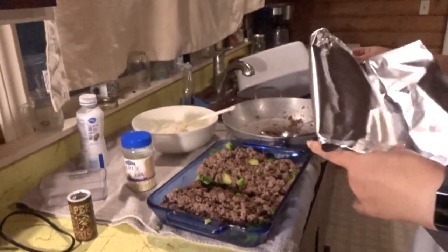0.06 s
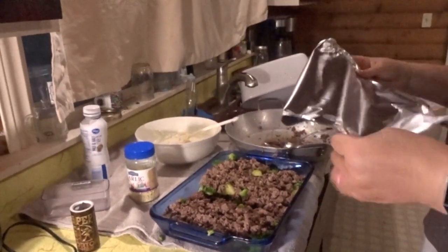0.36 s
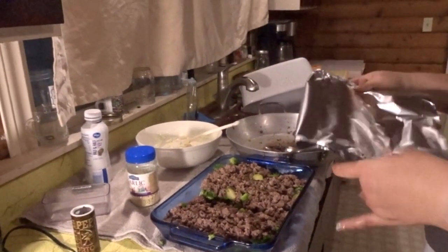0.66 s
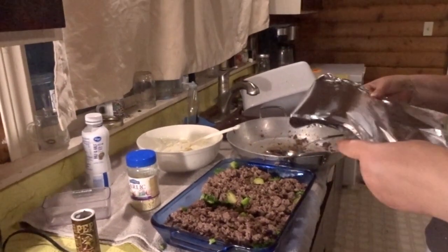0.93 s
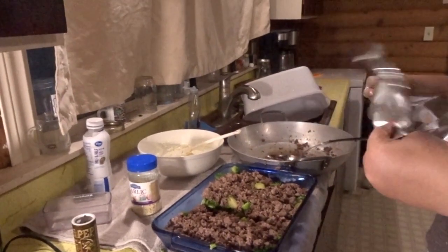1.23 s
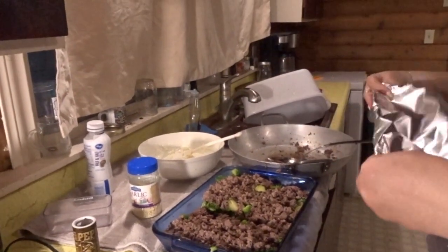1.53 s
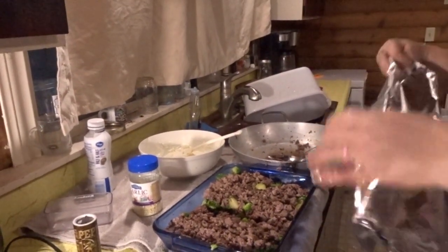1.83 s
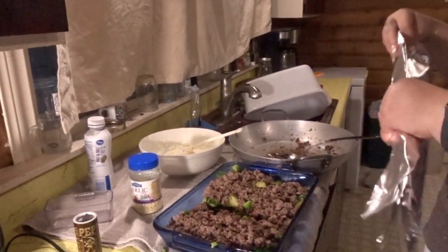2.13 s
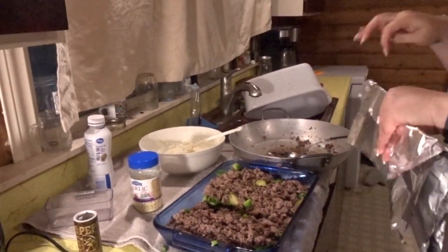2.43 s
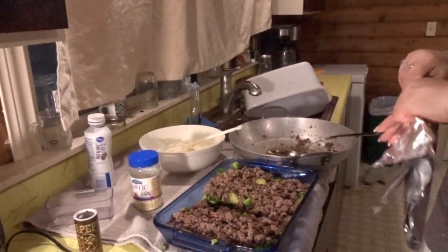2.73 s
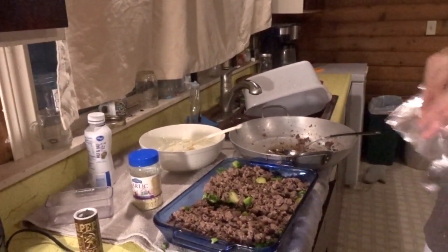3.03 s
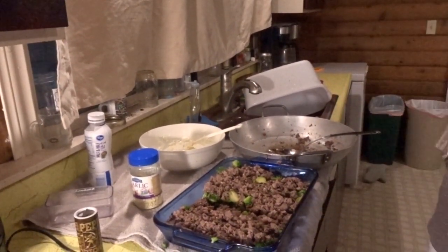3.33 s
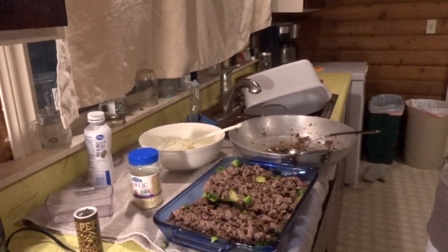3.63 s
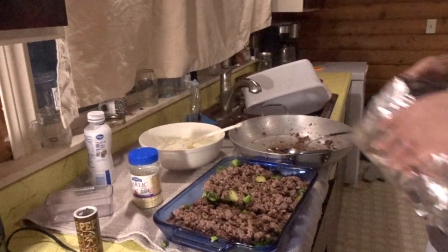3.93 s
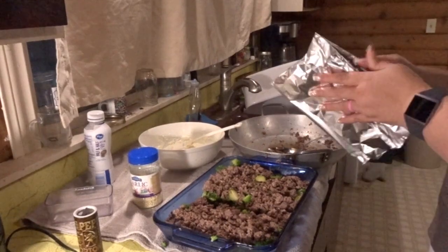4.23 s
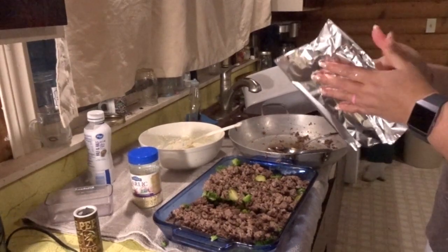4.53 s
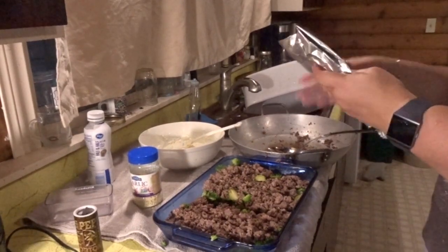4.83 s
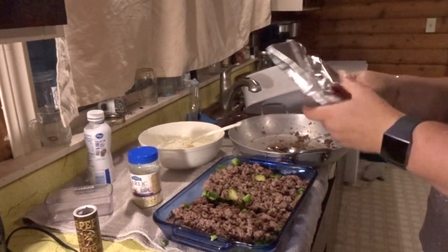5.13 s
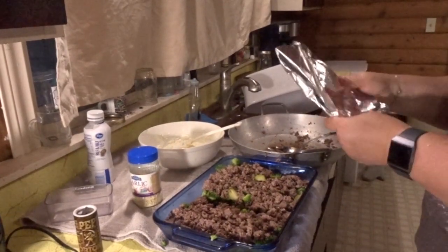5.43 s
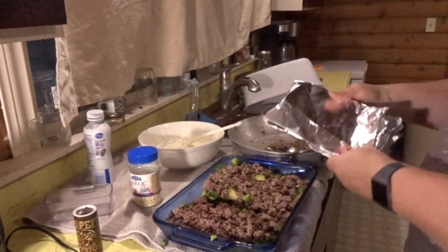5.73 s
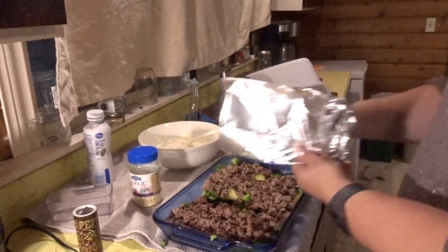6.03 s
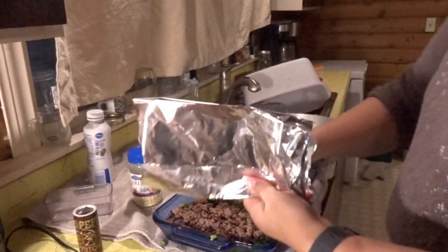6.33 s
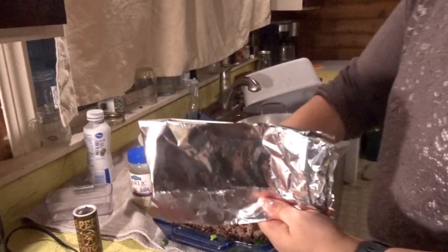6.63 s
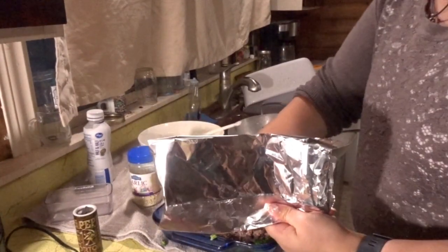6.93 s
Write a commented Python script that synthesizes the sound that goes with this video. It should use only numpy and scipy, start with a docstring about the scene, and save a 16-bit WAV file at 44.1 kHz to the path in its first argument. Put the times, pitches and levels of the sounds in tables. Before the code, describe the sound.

Aluminium foil crinkles and snaps as hands fold and flatten it, then fades to soft taps over a faint appliance hum.

```python
"""A small kitchen, a close-spaced microphone pair, two hands working aluminium foil a little to the right.
From the start the sheet is crumpled and folded: thousands of tiny creases buckle under each stroke, and
now and then a whole facet snaps through. Lighter pushes flatten it; from about 6 s it is lowered over
a dish with a few soft taps. Throughout, counter and room throw the crackle back and an appliance hums."""
import sys
import numpy as np
from scipy import signal
from scipy.fft import rfft, irfft, next_fast_len
from scipy.io import wavfile
from scipy.ndimage import uniform_filter1d

SR = 44100
rng = np.random.default_rng(int(sys.argv[2]) if len(sys.argv) > 2 else 0)


def log_audio(samples):
    """Write samples as a 16-bit WAV file to the path given in sys.argv[1]."""
    # one column per channel
    frames = np.atleast_2d(samples).T
    # limit to full scale, then quantise
    limited = np.clip(frames, -1, 1)
    pcm = np.round(limited * 32767).astype(np.int16)
    wavfile.write(sys.argv[1], SR, pcm)


N = 316197
T = np.arange(N) / SR


def amp(db):
    """Decibels to gain."""
    return 10 ** (np.asarray(db) / 20)


def unit(x):
    """Scales to rms 1."""
    return x / np.sqrt(np.mean(x ** 2) + 1e-20)


def read(points, hz):
    """Reads a table on a log-frequency axis."""
    f, value = np.transpose(points)
    return np.interp(np.log(hz + 1), np.log(f + 1), value)


def add(mix, start_s, sound):
    """Mixes a stereo sound in at start_s."""
    part = mix[:, max(round(start_s * SR), 0):][:, :sound.shape[1]]
    part += sound[:, :part.shape[1]]


def wander(per_s):
    """A new random value per_s times a second, joined by straight lines."""
    return np.interp(T * per_s, np.arange(1024), rng.standard_normal(1024))


def colour(x, gain):
    """Causal filter with the magnitude gain(hz), so that clicks keep their attack."""
    hz = abs(np.fft.fftfreq(4096, 1 / SR))
    minimum_phase = np.exp(np.conj(signal.hilbert(np.log(gain(hz) + 1e-5))))
    impulse = np.fft.ifft(minimum_phase).real[None, :len(hz) // 2]
    return signal.oaconvolve(x, impulse, axes=1)[:, :x.shape[1]]


def diffuse(pair):
    """Two close-spaced microphones hear diffuse bass alike and diffuse treble apart."""
    # likeness of left and right: f/Hz, correlation
    likeness = [(60, 0.92), (400, 0.95), (1200, 0.66), (2600, 0.57), (5500, -0.097), (11000, 0.24)]
    z = rfft(pair)
    same = read(likeness, np.fft.rfftfreq(pair.shape[1], 1 / SR))
    mid, side = z[0] * np.sqrt((1 + same) / 2), z[1] * np.sqrt((1 - same) / 2)
    return irfft([mid + side, mid - side], pair.shape[1])


def appliance(rush_db=-52.5, whirr_db=-57, whirr_hz=335, width_hz=55, waver=0.26, drift_hz=1.264):
    """In the background, a fan's rush with one broad resonance, and wavering motor tones."""
    # spectrum of the rush: f/Hz, relative density/dB
    rush_shape = [(18, -67), (30, -20.5), (49, -25), (157, -18.5), (216, -15.5), (338, -14), (382, -11.5),
                  (477, -17), (514, -22.5), (626, -15.5), (1280, -31.5), (1450, -28), (1680, -31.5),
                  (8590, -44), (11000, -52), (14300, -103), (22000, -120)]
    # motor tones: f/Hz, rms level/dB
    motor_tones = [(59.3, -73), (243, -63), (339.1, -62.5), (1405, -66.5), (1577, -76.5), (3370, -79.5)]
    noise = lambda gain: unit(colour(diffuse(rng.standard_normal((2, N))), gain))
    slow = lambda: np.interp(T, np.linspace(0, T[-1], 60), rng.standard_normal(60))
    rush = noise(lambda f: amp(read(rush_shape, f)))
    whirr = noise(lambda f: 1 / (1 + (2 * (f - whirr_hz) / width_hz) ** 2))
    hum = np.zeros(N)
    for hz, db in motor_tones:
        swell = np.sqrt(2) * amp(db) * (1 + waver * slow())
        hum += swell * np.sin(2 * np.pi * np.cumsum(hz + drift_hz * slow()) / SR)
    return amp(rush_db) * rush + amp(whirr_db) * whirr + hum


def room_echo(gap_s=0.0034, size=20000):
    """A short diffuse echo from cupboards and wooden walls, gap_s behind the direct sound."""
    # reverberation of the kitchen: f/Hz, t60/s
    decay_times = [(200, 0.23), (1000, 0.47), (4000, 0.18), (11000, 0.39)]
    reflections = rng.standard_normal((2, size)) * (rng.random((2, size)) < .1)
    reflections *= np.arange(size) / SR > gap_s
    hz, t, z = signal.stft(diffuse(reflections), SR, nperseg=256)
    echo = signal.istft(z * amp(-60 * t / read(decay_times, hz)[:, None]), SR, nperseg=256)[1]
    return echo / np.linalg.norm(echo[0])


def kitchen(x, wet_db=-6, moves_per_s=3, count=4):
    """Adds the room, fading between echo patterns as the sheet moves and bends."""
    fades = [np.cos(np.pi * (moves_per_s * T + k / count)) * np.sqrt(2 / count) for k in range(count)]
    echoes = sum(signal.oaconvolve(x * fade, room_echo(), axes=1)[:, :N] for fade in fades)
    return x + amp(wet_db) * echoes


def knocks(burst_t60_s=0.045, size=8192):
    """Damped taps of foil panels and of hands by the dish, each ringing around one resonance."""
    # taps: t/s, level of half the peak/dB, f/Hz, sharpness Q
    taps = [(2.017, -30, 8160, 6.8), (5.051, -29, 850, 5.1), (5.485, -32, 1950, 7),
            (5.89, -30.5, 2550, 8.4), (5.893, -26, 3900, 8), (6.112, -43.5, 1000, 1.6),
            (6.181, -45, 960, 1.7), (6.225, -47.5, 850, 3), (6.709, -53, 2610, 5), (6.752, -47, 160, 2),
            (6.753, -55, 1800, 16), (6.754, -50, 4990, 15), (6.844, -46, 623, 5.4), (6.92, -49, 1310, 5.1)]
    out, t = np.zeros((2, N)), np.arange(size) / SR
    for start, db, hz, sharpness in taps:
        burst = diffuse(rng.standard_normal((2, size))) * amp(-60 * t / burst_t60_s)
        tap = colour(burst, lambda f: 1 / np.hypot(1, sharpness * (f / hz - hz / (f + 1))))
        add(out, start, 2 * amp(db) * tap / abs(tap).max())
    return out


def facet(ring_s=0.00042, patchy_db=4, lag_s=3.3e-5, scatter_s=0.0069, size=1024):
    """One buckle: a click rings the sheet briefly in its own resonances; hands and counter scatter it."""
    t, hz = np.arange(size) / SR, np.fft.rfftfreq(size, 1 / SR)
    ring = rng.standard_normal(size) * np.exp(-t / (ring_s * np.exp(.5 * rng.standard_normal())))
    resonances = unit(uniform_filter1d(rng.standard_normal(len(hz)), size=30))
    ring = colour(ring[None], lambda f: amp(patchy_db * np.interp(f, hz, resonances)))
    left_lag = lag_s * (1 + 0.13 * rng.standard_normal())  # the left microphone is farther from the foil
    direct = np.exp(-2j * np.pi * hz * (np.array([[left_lag], [0]]) + 8 / SR))
    echoes = rng.standard_normal((2, size)) * (rng.random((2, size)) < .1) * np.exp(-t / scatter_s)
    echoes = diffuse(unit(echoes)) / np.sqrt(size)
    return unit(irfft(rfft(ring) * (direct + rfft(echoes))))


def sheet(count=180):
    """Many unlike facets, whose resonances together cover all pitches evenly."""
    z = rfft(np.array([facet() for _ in range(count)]))
    return irfft(z / np.sqrt(np.mean(abs(z) ** 2, axis=(0, 1))))


def buckle(clicks, facets):
    """Each click rings one facet of the sheet."""
    out = np.zeros((2, len(clicks)))
    place = rng.integers(0, len(facets), len(clicks))
    for i in np.flatnonzero(clicks):
        add(out, i / SR, clicks[i] * facets[place[i]])
    return out


def bend(x, panel_hz=3180, swing_octaves=0.53, width_octaves=0.064, panel_db=2.5, patches_db=1):
    """The sheet's resonances shift as it bends: one follows the free panel, small ones come and go."""
    hz, t, z = signal.stft(x, SR, nperseg=512)
    centre_hz = panel_hz * 2 ** (swing_octaves * np.interp(t, T, wander(per_s=5)))
    panel = np.exp(-(np.log2((hz[:, None] + 1) / centre_hz) / width_octaves) ** 2)
    patches = uniform_filter1d(rng.standard_normal(z.shape[1:]), size=4, axis=0)
    patches = unit(uniform_filter1d(patches, size=8, axis=1))
    return signal.istft(z * amp(panel_db * panel + patches_db * patches), SR, nperseg=512)[1][:, :N]


def registers(x, low_hz=1300, high_hz=6200):
    """Gives the foil its colour and splits it into broad flexing, creases and fine wrinkles."""
    # spectrum of the foil: f/Hz, relative density/dB
    foil_shape = [(50, -42.5), (100, -25), (170, -18.5), (240, -9), (300, -16.5), (420, -12.5), (520, -8),
                  (800, -7.5), (1400, -4.5), (2100, -0.1), (3200, 2.5), (5000, 2.03), (8000, 2), (11000, 0)]
    size = next_fast_len(x.shape[1] + 512)
    hz = np.fft.rfftfreq(size, 1 / SR)
    z = rfft(colour(x, lambda f: amp(read(foil_shape, f))), size)
    low = 1 / (1 + (hz / low_hz) ** 5)
    high = 1 - 1 / (1 + (hz / high_hz) ** 6)
    return [irfft(z * share, size)[:, :x.shape[1]] for share in (low, 1 - low - high, high)]


def snaps(facets, tilt_db=1, run_s=0.0083, follow=0.55, per_s=3000, size=3000):
    """A large facet flips over and sets off a short run of its neighbours."""
    # snaps: t/s, crease level/dB, then fine wrinkles/dB and flexing/dB re the crease, before the tilt
    flips = [(0.18, -22, 2, -19.5), (0.226, -27, -1, -13.5), (0.573, -22, 0, -21), (0.652, -36, 10, -15),
             (0.983, -30.5, 16, -4), (2.016, -42.5, 15, -20), (2.442, -29, 2, -25), (2.527, -33.5, 5, -29),
             (2.685, -28, 10.5, -5), (2.88, -33, 5, -21), (3.304, -35, 0.5, -20), (3.479, -23, -9, -14),
             (3.825, -29, 1, -15), (4.003, -32, 5, -18), (4.103, -39.5, 13.5, -10),
             (4.171, -16.5, -12, -17), (4.322, -26, -10, -20), (4.536, -38, 0, -15), (4.697, -32, -9, -15),
             (4.904, -44, 3, -20), (4.953, -32, -7, -20), (4.972, -30, 2, -18), (5.047, -23, 2, -13),
             (5.119, -31, 3, -11), (5.258, -28.5, 5, -18), (5.565, -34, 6.5, -23), (5.596, -44, 6, -20),
             (5.709, -33, 7, -6), (5.787, -37, 7.5, -6), (5.8897, -27.5, -6, -32), (5.894, -36, 2, -28),
             (5.922, -42, -9.5, 1), (6.044, -52, -5, -15), (6.118, -42, -6, -17), (6.376, -61, -18, 11.5),
             (6.578, -58.5, 8.5, -10), (6.708, -58.5, -8, -13), (6.752, -57.5, -10, -4)]
    out, t = np.zeros((2, N)), np.arange(size) / SR
    for start, level, fine, flex in flips:
        clicks = follow * rng.standard_normal(size) * (rng.random(size) < per_s / SR) * np.exp(-t / run_s)
        clicks[0] = 1  # the flip itself
        for band, db in zip(registers(buckle(clicks, facets)), (flex - tilt_db, 0, fine + tilt_db)):
            peak = np.sqrt(uniform_filter1d((band ** 2).mean(0), size=88).max())
            add(out, start, band / peak * amp(level + db))
    return out


def hands(sag_db_per_s=8, release_db_per_s=184):
    """The foil gives way under each push and settles on release; gives level and fine share in dB."""
    # pushes into the sheet: t/s, attack/s, hold/s, level/dB, base share of fine wrinkles/dB
    strokes = [(-0.005, 0.005, 0.035, -30, -2), (0.087, 0.012, 0.072, -29.0, -0.5),
               (0.131, 0.052, 0.16, -22.5, 3), (0.375, 0.044, 0.044, -27.5, -3.5),
               (0.476, 0.012, 0.127, -25.5, 3), (0.634, 0.019, 0.2, -22.5, 4.5),
               (0.893, 0.0037, 0.067, -28.5, 1), (0.956, 0.052, 0.12, -23.0, 4.5),
               (1.133, 0.048, 0.17, -23.0, 0.5), (1.337, 0.023, 0.2, -25, 0),
               (1.564, 0.037, 0.15, -25, -0.5), (1.755, 0.045, 0.0066, -26, 0),
               (1.951, 0.016, 0.087, -44, -3), (2.107, 0.029, 0.08, -22, 0), (2.251, 0.082, 0.12, -31, 1.5),
               (2.5, 0.015, 0.125, -42.0, 7.5), (2.634, 0.075, 0.02, -22.5, 1.5),
               (2.755, 0.028, 0.011, -26.5, -2), (2.88, 0.0025, 0.0053, -31.5, -2),
               (2.909, 0.038, 0.1, -29.5, 3), (3.065, 0.052, 0.094, -24, 3),
               (3.287, 0.025, 0.196, -28.5, 3), (3.465, 0.0055, 0.2, -28.5, 0.5),
               (3.732, 0.053, 0.27, -34.5, 5.5), (4.09, 0.0084, 0.075, -39.5, 7),
               (4.166, 0.0055, 0.1, -26, 3.5), (4.292, 0.0216, 0.041, -25.0, 1),
               (4.369, 0.0087, 0.079, -30.5, 2), (4.512, 0.027, 0.065, -36.5, 3),
               (4.627, 0.031, 0.095, -35.5, 7), (4.78, 0.0094, 0.048, -39.5, 6.5),
               (4.941, 0.016, 0.012, -33, 6), (5.015, 0.024, 0.059, -31.5, 2), (5.154, 0.13, 0.014, -34, 1),
               (5.307, 0.012, 0.079, -30, 5.5), (5.459, 0.021, 0.004, -39, 8),
               (5.558, 0.018, 0.069, -37, 7), (5.699, 0.01, 0.0032, -36, 10),
               (5.761, 0.016, 0.02, -42, 1.5), (5.913, 0.003, 0.035, -40.5, 10)]
    power, fine = np.zeros(N), np.zeros(N)
    for start, attack, hold, db, fine_db in strokes:
        held = np.maximum(T - start - attack, 0)
        fall_db = sag_db_per_s * held + release_db_per_s * np.maximum(held - hold, 0)
        push = (np.clip((T - start) / attack, 0, 1) * amp(db - fall_db)) ** 2
        power += push
        fine += push * fine_db
    return 10 * np.log10(power + 1e-12), fine / (power + 1e-12)


def crackle(facets, firm_db=-24.5, firm_clicks_per_s=3400, uneven_db=1, spread_db=2, clump_db=1.06):
    """Creases buckle in little avalanches; the harder the stroke, the more of them each second."""
    # broad flexing, strongest as the sheet is doubled over or patted flat: t/s, share at a firm push/dB
    flexing = [(.1, -14), (.4, -14.5), (.7, -18.5), (1.2, -12.5), (1.8, -15), (3.1, -15), (3.6, -13),
               (4.3, -12.8), (4.7, -16.5), (5.8, -13)]
    level, fine = hands()
    level += uneven_db * wander(per_s=39.96)  # the foil catches and yields within a push
    effort_db = level - firm_db
    fine += 0.43 * effort_db  # a harder push is brighter
    flex = np.interp(T, *np.transpose(flexing)) - 0.092 * effort_db
    rate = firm_clicks_per_s * amp(.4 * effort_db)
    avalanches = unit(uniform_filter1d(rng.standard_normal(N), size=200))
    clicks = (rng.random(N) < rate / SR) * rng.choice([-1, 1], N)
    strength = amp(spread_db * np.minimum(rng.exponential(1, N), 3.7) + clump_db * avalanches)
    creases = bend(buckle(clicks * strength, facets))
    out = np.zeros((2, N))
    for band, db in zip(registers(creases), (flex, 0, fine)):
        power = uniform_filter1d(uniform_filter1d((band ** 2).mean(0), size=700), size=700)
        steady = band / np.sqrt(abs(power) + 1e-4 * power.mean())
        out += steady * amp(level + db)  # the stroke sets the power released
    return out


def scene():
    """The foil a little right of the microphones, the kitchen around it, the appliance behind."""
    facets = sheet()
    foil = (crackle(facets) + snaps(facets)) * amp([[-.35], [.35]])
    return kitchen(foil + knocks()) + appliance()


def record(dry):
    """The recorder's band limit."""
    lowpass = signal.firwin(601, cutoff=11060, window=("kaiser", 8), fs=SR)
    return signal.oaconvolve(dry, lowpass[None], "same", axes=1)


dry = scene()
out = record(dry)
log_audio(out)
```